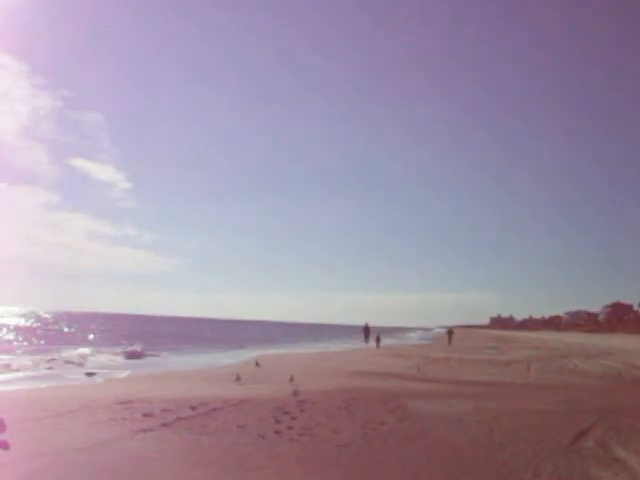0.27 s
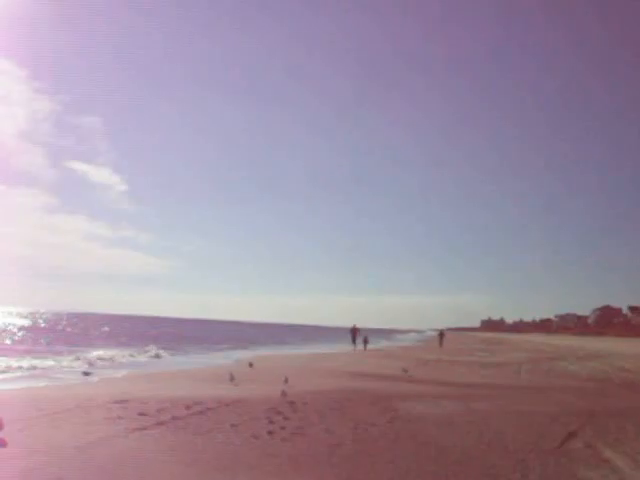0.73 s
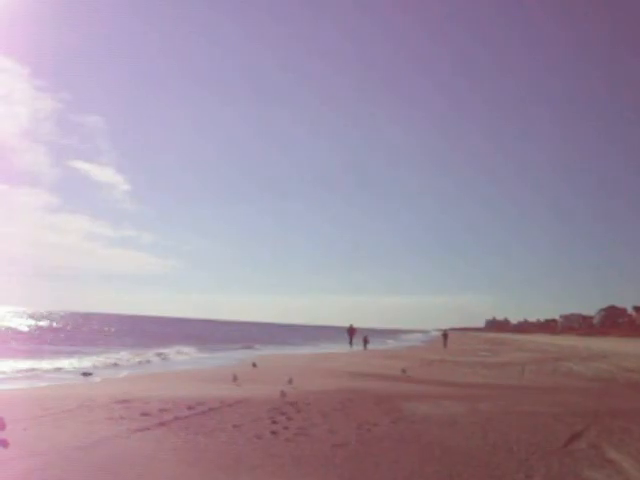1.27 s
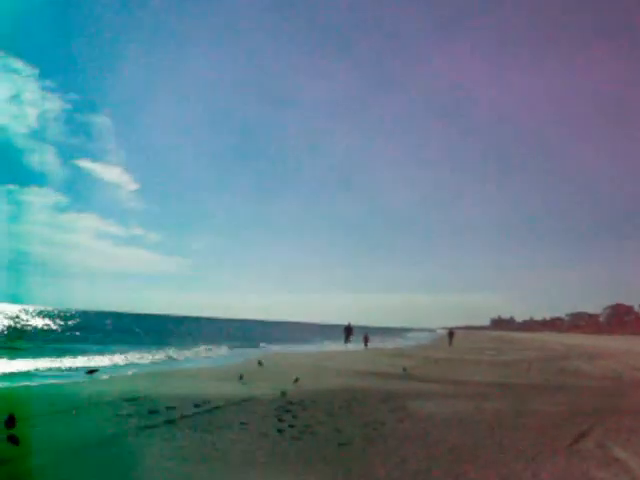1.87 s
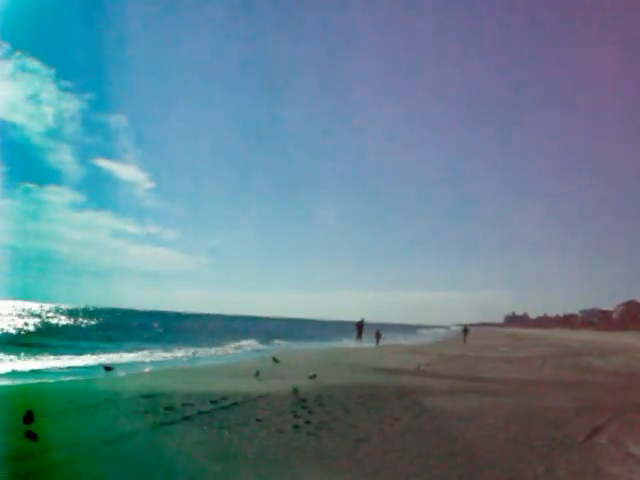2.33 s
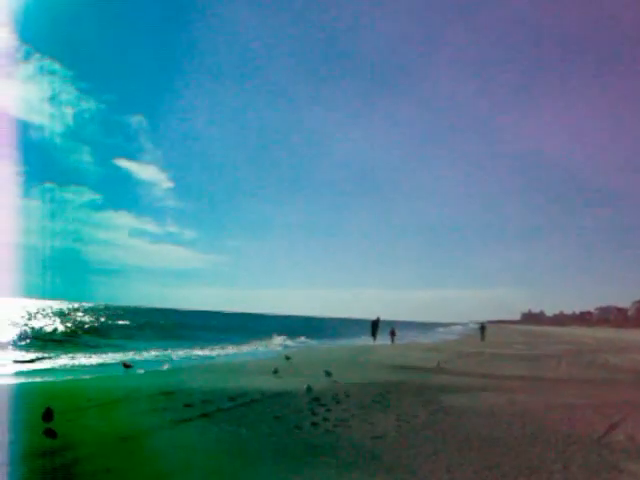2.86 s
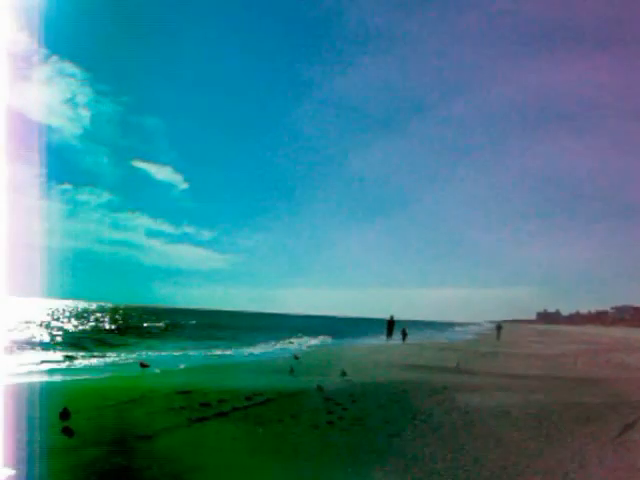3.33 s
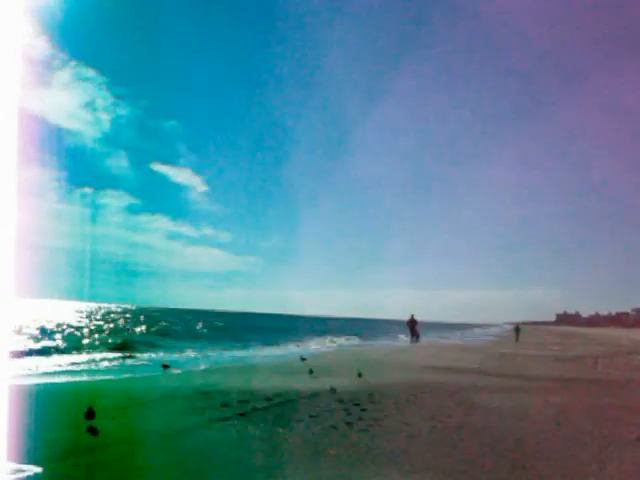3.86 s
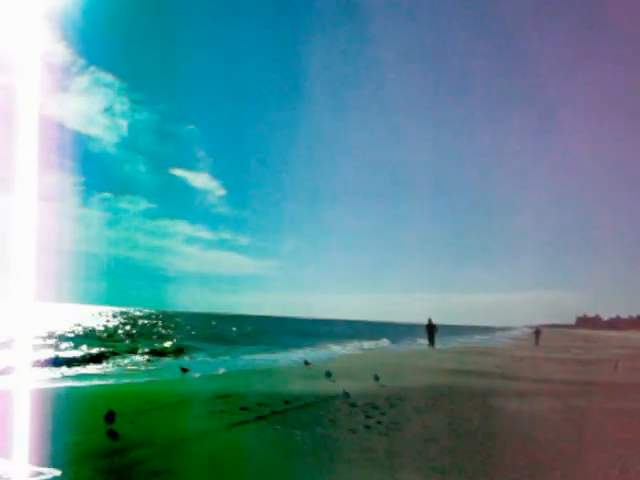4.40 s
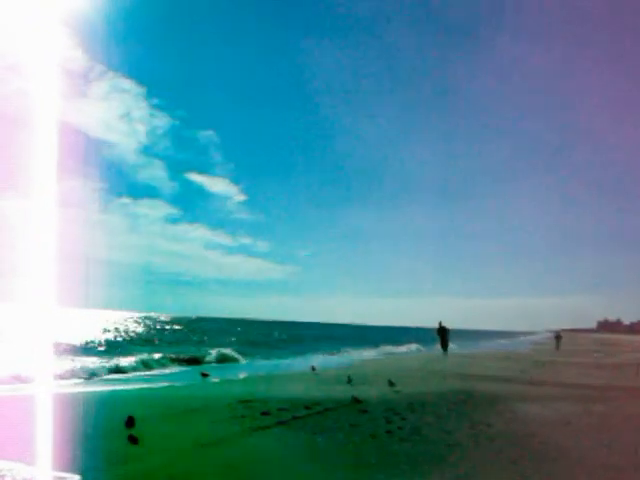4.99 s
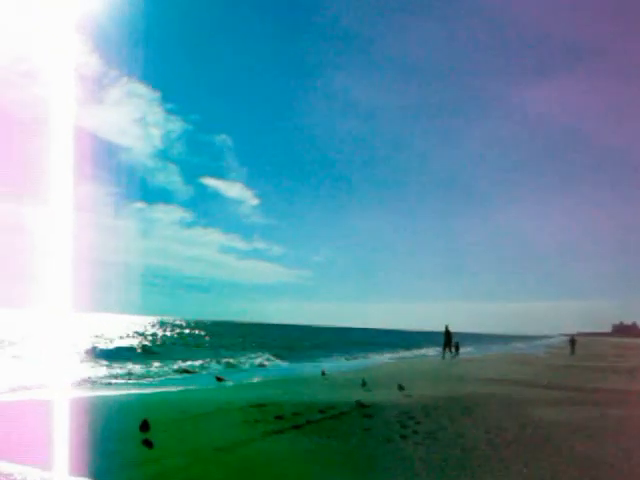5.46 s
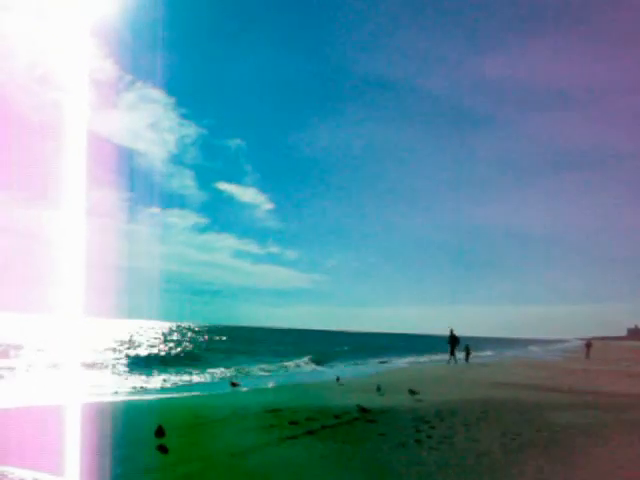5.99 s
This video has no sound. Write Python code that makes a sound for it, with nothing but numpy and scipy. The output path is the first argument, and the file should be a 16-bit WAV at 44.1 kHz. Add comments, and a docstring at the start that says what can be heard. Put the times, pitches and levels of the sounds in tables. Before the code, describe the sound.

On a sandy beach, a wave washes in and drains away with crackling foam. Small waves slap in the lull, then a bigger one breaks with a low boom, a roaring wash and hissing spray. A shorebird whistles a short, high phrase twice. Wind rumbles and thumps on the microphone throughout and makes it pop once near the end. The sound is slightly dull.

```python
"""A sandy beach: one wave drains away, small ones slap in the lull, then a big one breaks and foams.
Trapped air booms, the wash roars, bubbles crackle, spray hisses. A shorebird whistles a phrase twice.
Wind buffets the microphone of a small camera and once makes it pop.
The camera samples slowly, so the sound is dull and each whistle has a faint mirror tone above it."""
import sys
import numpy as np
from scipy import signal
from scipy.fft import rfft, irfft
from scipy.io import wavfile
from scipy.ndimage import uniform_filter1d

SR = 44100
rng = np.random.default_rng(int(sys.argv[2]) if len(sys.argv) > 2 else 0)


def wav_record(signal):
    """Record a signal, one row per channel, as 16-bit PCM in the file named by sys.argv[1]."""
    frames = np.transpose(np.atleast_2d(signal))
    bounded = np.clip(frames, -1, 1)
    # unit amplitude maps onto the largest positive 16-bit level
    quanta = np.round(bounded * 32767).astype(np.int16)
    wavfile.write(sys.argv[1], SR, quanta)


N = 274280
TIME_S = np.arange(N) / SR

# Breaking waves. Each row: start in seconds, rise in seconds, fade in dB per second, wash level in dB,
# plunge in dB over the wash, foam in dB over the wash.
BREAKERS = [(-.2, 0.29, 9.5, -24.5, 3, -4), (0.419, 0.2, 16.5, -28.5, 1, -4),
            (1.199, 0.76, 8.5, -42, 12, -8.5), (2.98, 0.12, 12, -33, -1, -6),
            (3.32, 0.051, 27, -32.5, -6.5, -4), (3.66, 0.11, 15, -32.5, -7, -10),
            (3.919, 0.34, -0.5, -31.5, -3, -2), (4.35, 0.3, 8, -24, -1, -5.5), (4.6, 0.66, 0.5, -23, 4, -6),
            (5.72, 0.25, 16, -21, -6, -5.5)]
# Source spectra. Each row: frequency in Hz, relative density in dB.
PLUNGE_SPECTRUM = [(60, -17), (140, 2), (230, 0.5), (380, -1.5), (560, -6.5), (800, -15.5), (1400, -36)]
WASH_SPECTRUM = [(300, -18.5), (520, -4), (720, -3), (1020, -2.5), (1220, -5), (1450, -13), (2000, -35)]
COARSE_FOAM_SPECTRUM = [(900, -22), (1500, -1), (1980, 5), (2350, 1), (2750, -2), (3350, 1.5), (3800, -9),
                        (4400, -12.5), (4900, -9.5), (5500, -15)]
FINE_FOAM_SPECTRUM = [(1000, -24), (1600, -7), (2500, -4), (3400, -3), (4200, -7), (5000, -13), (5500, -14)]
WIND_SPECTRUM = [(5, -6.5), (20, 9.5), (40, -3.5), (72, -2), (100, -10), (150, -16.5), (220, -21.5),
                 (400, -32.5), (1200, -70.5)]
SPRAY_SPECTRUM = [(700, -22.5), (1100, -4), (1500, -10), (3300, 5), (4000, 1), (5100, 2), (5500, -6)]
# Foam is finer while a wave drains. Each row: time in seconds, power share of fine bubbles from 0 to 1.
FINE_FOAM_SHARE = [(1.0, 0.54), (3.0, 0.54), (4.6, 0.02), (5.3, 0.21), (5.9, 0.06)]
# Breeze on the microphone. Each row: time in seconds, relative level in dB.
BREEZE_CURVE = [(0.0, -16.5), (0.36, -23.5), (0.57, -18.5), (0.92, -29.5), (1.35, -23), (2.46, -30),
                (3.13, -25.5), (3.69, -27), (5.42, -23), (5.56, -22), (5.96, -21), (6.22, -23)]
# Single eddies. Each row: centre in seconds, relative level in dB, half length in seconds, pitch in Hz.
WIND_BUFFETS = [(.03, -11.5, 0.015, 87), (0.112, -14.5, 0.039, 65), (0.372, -10.5, .028, 62),
                (0.429, -14, 0.015, 70), (0.599, -22, .05, 60.6), (0.709, -16, .03, 35),
                (0.863, -14, 0.023, 55), (1.142, -8, 0.037, 61.4), (1.213, -8.5, 0.025, 119.5),
                (1.555, -20, 0.021, 39), (1.968, -19.5, .03, 35), (2.322, -16, 0.017, 48),
                (2.697, -21.5, 0.064, 48), (2.84, -23, 0.046, 115), (2.947, -17, 0.023, 45),
                (3.278, -18.5, 0.042, 45), (3.478, -15.5, 0.029, 44), (3.944, -19.5, 0.044, 35),
                (4.049, -12, 0.015, 60), (4.183, -17, 0.036, 38), (4.6, -13.5, 0.032, 55),
                (4.674, -10.5, 0.023, 55), (5.424, -14.5, 0.029, 45), (5.494, -13.5, 0.021, 38),
                (5.653, -4, 0.046, 58.6), (6.148, -22.5, 0.031, 40)]
# Whistles, four to a phrase. Each row: start in seconds, length in seconds, mid pitch in Hz, glide in Hz,
# lift of both ends in Hz, relative level in dB, loudest point from 0 to 1, ends in dB over that point.
BIRD_NOTES = [(1.594, .041, 3632, 100, 70, -26.5, .55, -11), (1.633, .081, 3803, -140, 280, -25, .55, -12),
              (1.713, .099, 4590, 140, 28, -29.5, .08, -8), (1.8, .158, 3882, -370, 0, -30.3, .55, -13),
              (3.966, .054, 3593, -210, 35, -28.5, .8, -10), (4.019, .074, 3943, -60, 180, -15.2, .2, -9),
              (4.088, .122, 4680, 50, 75, -30.5, .08, -9), (4.172, .178, 3938, -530, -20, -21.4, .48, -19)]
# Octave splits. Each row: centre in seconds, level in dB over the whistle, half length in seconds.
BIRD_SPLITS = [(1.685, -13, .035), (4.07, -10, .024)]
# Water slaps. Each row: start in seconds, peak in dB, pocket pitch in Hz, burst decay in seconds.
WATER_SLAPS = [(1.975, -18, 635, 0.016), (3.045, -19, 980, 0.038), (3.070, -14, 1110, 0.0046),
               (3.175, -17.5, 1260, 0.0031), (3.398, -17, 1160, 0.054), (3.471, -16.5, 1090, 0.022),
               (3.697, -16, 1060, 0.0019), (3.853, -21, 950, 0.0016), (4.003, -16.5, 940, 0.016),
               (5.759, -17, 1090, 0.0013), (5.762, -6.5, 2140, 0.0035), (5.914, -2, 990, 0.0012),
               (6.017, -8.5, 1980, 0.0035)]
# Spray bursts. Each row: peak time in seconds, level in dB, rise in seconds, fall in seconds.
SPRAY_BURSTS = [(3.06, -38.5, 0.047, 0.026), (3.401, -30, 0.003, 0.0087), (3.48, -43.5, 0.048, 0.08),
                (3.72, -39, 0.035, 0.043), (3.99, -36, .008, 0.019), (4.44, -33, .028, 0.17),
                (5.505, -27, 0.12, 0.071)]


def gain(db):
    """Decibels to amplitude."""
    return 10 ** (np.asarray(db) / 20)


def unit_rms(x):
    """Scales to rms 1."""
    return x / np.sqrt(np.mean(x ** 2) + 1e-20)


def bell(t_s, centre_s, half_s):
    """Gaussian pulse, peak 1."""
    return np.exp(-((t_s - centre_s) / half_s) ** 2)


def follow(curve):
    """Time-value rows interpolated to every sample."""
    return np.interp(TIME_S, *np.transpose(curve))


def add(mix, start_s, sound):
    """Mixes a sound in at start_s."""
    part = mix[round(start_s * SR):][:len(sound)]
    part += sound[:len(part)]


def shaped(x, spectrum):
    """Filters x by a spectrum, at rms 1."""
    hz, db = np.transpose(spectrum)
    bins_hz = np.fft.rfftfreq(N, 1 / SR)
    curve_db = np.interp(np.log(bins_hz + 1), np.log(hz), db, right=-100)
    return unit_rms(irfft(rfft(x) * gain(curve_db), N))


def churn(patchy_db, flicker_db):
    """Noise with short patches in time and pitch, and a flicker shared by all pitches."""
    frames = signal.stft(rng.standard_normal(N), nperseg=512)[2]
    patches = uniform_filter1d(rng.standard_normal(frames.shape), size=7, axis=0)
    patches = unit_rms(uniform_filter1d(patches, size=8, axis=1))
    flicker = unit_rms(uniform_filter1d(rng.standard_normal(frames.shape[1]), size=4))
    frames *= gain(patchy_db * patches + flicker_db * flicker)
    return unit_rms(signal.istft(frames, nperseg=512)[1][:N])


def droplets(per_s, spread_db):
    """Sparse clicks, most small, a few large."""
    sizes = gain(spread_db * np.minimum(rng.exponential(1, N), 4))
    return unit_rms(sizes * rng.choice([-1, 1], N) * (rng.random(N) < per_s / SR))


def breaker_gains(far_plunge_db=-35, far_wash_db=-35, far_foam_db=-40):
    """Plunge, wash and foam envelopes: waves add in power over steady far surf."""
    power = gain([[far_plunge_db], [far_wash_db], [far_foam_db]]) ** 2
    for start_s, rise_s, fade_db_per_s, wash_db, plunge_db, foam_db in BREAKERS:
        swell = np.sin(np.pi / 2 * np.clip((TIME_S - start_s) / rise_s, 0, 1))
        envelope = swell * gain(wash_db - fade_db_per_s * np.maximum(TIME_S - start_s - rise_s, 0))
        power = power + (gain([[plunge_db], [0], [foam_db]]) * envelope) ** 2
    return np.sqrt(power)


def surf(dip_db=-10):
    """Trapped air booms as a wave tumbles; wash roars and foam crackles. The hiss dips briefly once."""
    plunge = shaped(churn(patchy_db=0.65, flicker_db=0.26), PLUNGE_SPECTRUM)
    wash = churn(patchy_db=0.85, flicker_db=0.5) + 0.37 * droplets(per_s=370, spread_db=6)
    coarse = churn(patchy_db=0.5, flicker_db=0.5) + 0.53 * droplets(per_s=990, spread_db=3.5)
    fine = churn(patchy_db=0, flicker_db=1.5) + 0.35 * droplets(per_s=3700, spread_db=0.5)
    fine_share = np.clip(follow(FINE_FOAM_SHARE), 0, 1)
    foam = np.sqrt(1 - fine_share) * shaped(coarse, COARSE_FOAM_SPECTRUM)
    foam += np.sqrt(fine_share) * shaped(fine, FINE_FOAM_SPECTRUM)
    plunge_gain, wash_gain, foam_gain = breaker_gains()
    dip = gain(dip_db * bell(TIME_S, centre_s=4.692, half_s=0.009))
    return plunge * plunge_gain + dip * (shaped(wash, WASH_SPECTRUM) * wash_gain + foam * foam_gain)


def puffs(slow_hz=6, fast_hz=16):
    """Random unsteadiness of the air, at rms 1."""
    rates_hz = np.geomspace(slow_hz, fast_hz, 20)
    return unit_rms(sum(np.sin(2 * np.pi * (hz * TIME_S + rng.random())) for hz in rates_hz))


def wind(puff_db=3, trim_db=1, steadiness=0.35, strong_db=-12, small_db=-7, small_growth=1.3):
    """Eddies rumble on the microphone; strong gusts shed smaller, higher ones."""
    level_db = follow(BREEZE_CURVE) + trim_db + puff_db * puffs()
    eddies = shaped(rng.standard_normal(N), WIND_SPECTRUM)
    local_power = uniform_filter1d(eddies ** 2, size=3000)
    eddies = unit_rms(eddies / local_power ** (steadiness / 2))
    small = shaped(rng.standard_normal(N), [(40, -18), (90, 4), (190, -5.5), (320, -24.5), (900, -44.5)])
    small_level_db = strong_db + small_db + small_growth * (level_db - strong_db)
    return eddies * gain(level_db) + small * gain(small_level_db)


def buffets(edge_ratio=1.71):
    """Single eddies strike the microphone with a dull thump."""
    out = np.zeros(N)
    t_s = np.arange(-SR // 8, SR // 8) / SR
    for centre_s, db, half_s, hz in WIND_BUFFETS:
        band = signal.butter(3, [hz / edge_ratio, hz * edge_ratio], "bandpass", fs=SR, output="sos")
        thump = signal.sosfilt(band, rng.standard_normal(len(t_s))) * bell(t_s, 0, half_s)
        thump = gain(db) * unit_rms(thump) * np.sqrt(half_s / np.ptp(t_s))
        out += np.interp(TIME_S - centre_s, t_s, thump, left=0, right=0)
    return out


def bird(trim_db=-2.5, waver=0.0045):
    """Nearly pure whistles bend and fade at their ends; twice a weak tone splits off an octave below."""
    out = np.zeros(N)
    for start_s, length_s, mid_hz, glide_hz, lift_hz, db, loudest, ends_db in BIRD_NOTES:
        t_s = np.arange(start_s, start_s + length_s, 1 / SR)
        position = np.linspace(-1, 1, len(t_s))
        pitch_hz = mid_hz + glide_hz * (2 * position + position ** 3) / 6 + lift_hz * abs(position) ** 3
        jitter = unit_rms(uniform_filter1d(rng.standard_normal(len(t_s)), size=120))
        phase_rad = 2 * np.pi * np.cumsum(pitch_hz * (1 + waver * jitter)) / SR
        split = sum(gain(split_db) * bell(t_s, at_s, half_s) for at_s, split_db, half_s in BIRD_SPLITS)
        tone = unit_rms(np.sin(phase_rad) + split * np.sin(phase_rad / 2))
        fade_db = ends_db * np.interp((t_s - start_s) / length_s, [0, loudest, 1], [1, 0, 1]) ** 2
        add(out, start_s, tone * gain(db + trim_db + fade_db) * signal.windows.tukey(len(t_s), 0.06))
    return out


def slaps(pocket_q=4, splash_mix=0.16, splash_cutoff_hz=3300):
    """Each slap rings a heavily damped air pocket, with a little splash on top."""
    out = np.zeros(N)
    t_s = np.arange(SR // 8) / SR
    for start_s, peak_db, hz, decay_s in WATER_SLAPS:
        burst = rng.standard_normal(len(t_s)) * np.exp(-t_s / decay_s)
        burst[0] = 4  # sharp first contact
        pocket = np.sin(2 * np.pi * hz * t_s) * np.exp(-np.pi * hz * t_s / pocket_q)
        ring = signal.fftconvolve(burst, pocket)[:len(t_s)]
        splash = signal.lfilter(*signal.butter(3, splash_cutoff_hz, fs=SR), burst)
        slap = unit_rms(ring) + splash_mix * unit_rms(splash)
        add(out, start_s, gain(peak_db) * slap / abs(slap).max())
    return out


def spray():
    """Fine drops hiss in short swells."""
    swell = sum(gain(db) * bell(TIME_S, peak_s, np.where(TIME_S < peak_s, rise_s, fall_s))
                for peak_s, db, rise_s, fall_s in SPRAY_BURSTS)
    hiss = rng.standard_normal(N) + 0.5 * droplets(per_s=1800, spread_db=3)
    return swell * shaped(hiss, SPRAY_SPECTRUM)


def pop(at_s=5.5934, gap_s=0.00054, push_decay_s=0.00069, crack_half_s=0.00005):
    """The microphone overloads: a short push of pressure, broken by a double crack."""
    push = np.exp(-abs(TIME_S - at_s - gap_s / 2) / push_decay_s)
    cracks = bell(TIME_S, at_s, crack_half_s) + bell(TIME_S, at_s + gap_s, crack_half_s)
    return 1.55 * push - 2.45 * cracks


def gain_control(x, recovery_db_per_s=35):
    """A peak over full scale slips through, then the level drops and recovers."""
    over_db = 20 * np.log10(np.maximum(abs(x), 1))
    ramp_db = TIME_S * recovery_db_per_s
    held_db = np.maximum.accumulate(over_db + ramp_db, axis=1) - ramp_db
    attack = np.hanning(200)
    return x / gain(signal.lfilter(attack / attack.sum(), 1, held_db))


def scene(gust_limit=0.6):
    """Sea, wind and bird at one microphone; the strongest gusts are softly limited so they do not clip."""
    gusts = gust_limit * np.tanh((wind() + buffets()) / gust_limit)
    return (surf() + spray() + slaps() + gusts + bird() + pop())[None]


def record(dry, decimation=4, smoothing_hz=5480, band_limit_hz=15800):
    """Gain control; slow sampling with soft smoothing mirrors the treble; then clipping, band limit."""
    sampled = decimation * gain_control(dry) * (np.arange(N) % decimation == 0)
    smoothing = signal.firwin(65, smoothing_hz, window=("kaiser", 9), fs=SR)[None]
    band_limit = signal.firwin(511, band_limit_hz, window=("kaiser", 9), fs=SR)[None]
    smoothed = signal.oaconvolve(sampled, smoothing, "same")
    return signal.oaconvolve(np.clip(smoothed, -1, 1), band_limit, "same")


dry = scene()
out = record(dry)
wav_record(out)
```